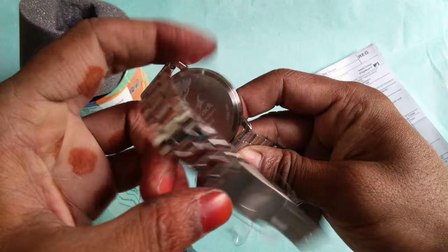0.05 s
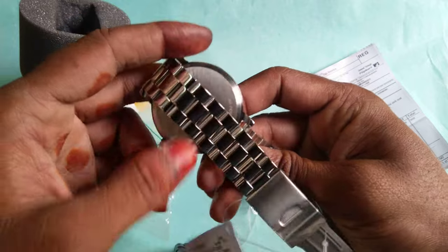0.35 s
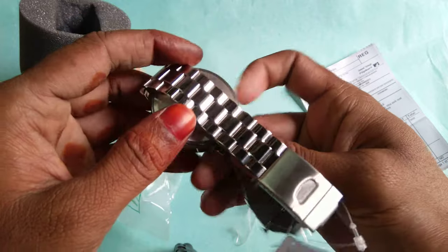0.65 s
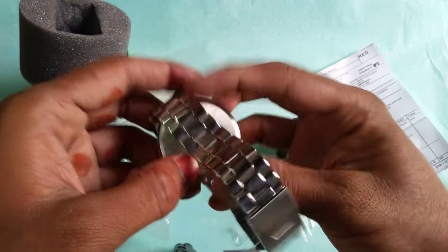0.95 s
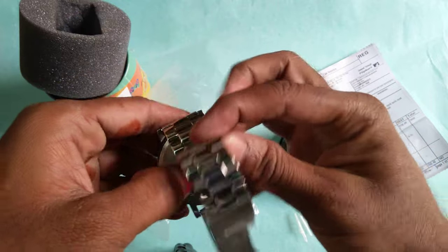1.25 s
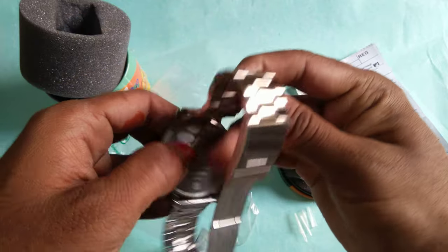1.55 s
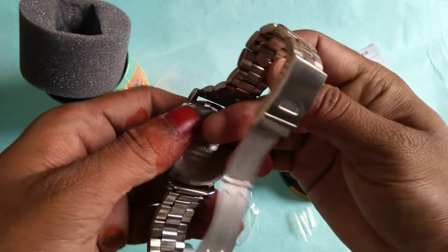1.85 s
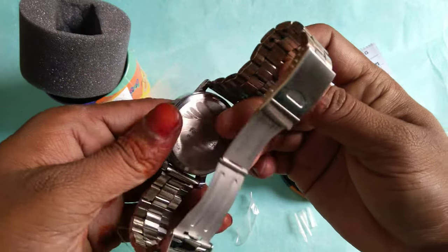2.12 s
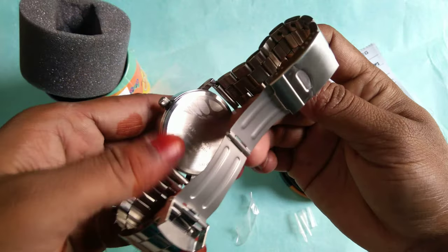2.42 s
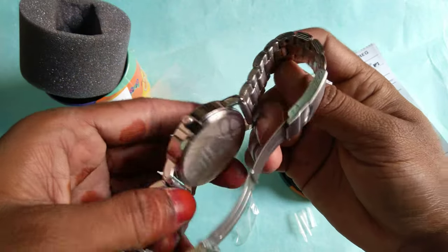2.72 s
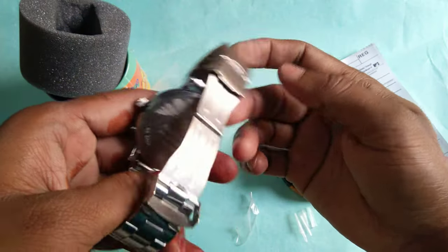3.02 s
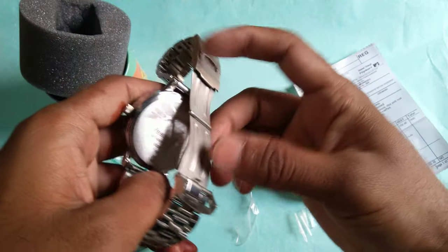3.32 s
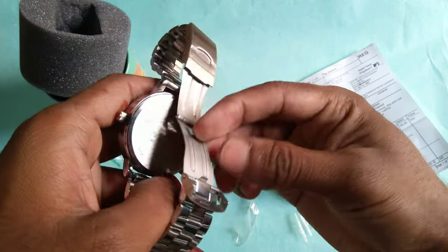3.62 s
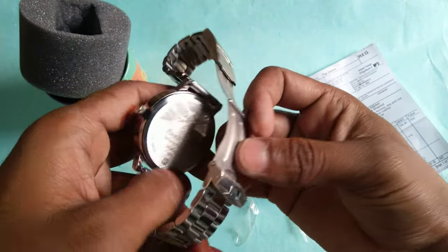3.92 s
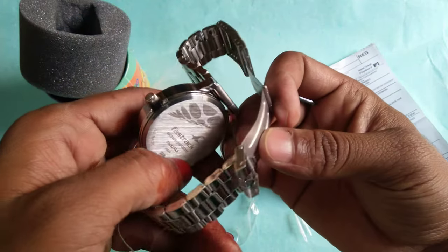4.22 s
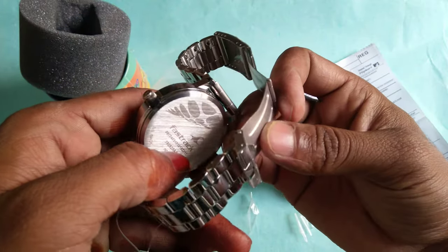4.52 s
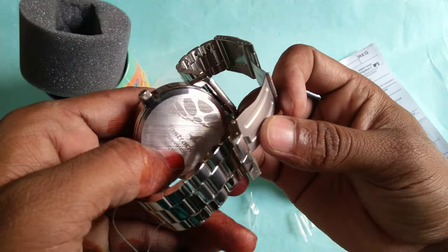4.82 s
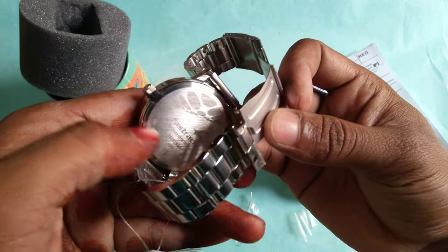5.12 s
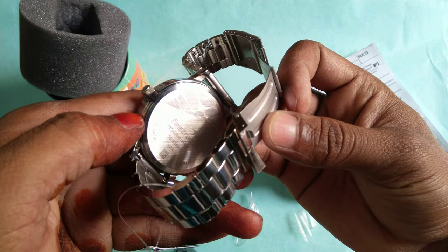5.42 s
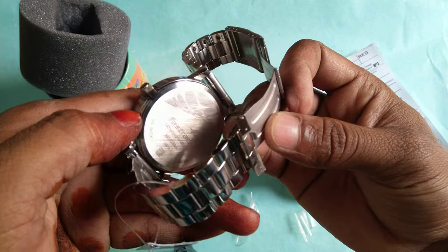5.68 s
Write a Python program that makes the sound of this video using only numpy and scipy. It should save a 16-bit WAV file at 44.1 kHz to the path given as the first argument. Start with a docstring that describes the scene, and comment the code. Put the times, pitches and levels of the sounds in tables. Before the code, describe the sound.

Close up in a quiet small room, a metal watch bracelet rattles with short, bright clicks and a light scraping of links as fingers shift it. The clinking thins out, returns briefly around the middle, and gives way to a thin, stuttering squeak from the clasp. Then skin hisses softly across steel over a few low handling thumps. A very faint motor whine and distant bird chirps lie underneath.

```python
"""A steel watch turns in two hands, close to a phone in a small room: links and folding clasp strike
each other with a crack and a short ring, among a few dull knocks. The bracelet rasps,
the clasp hinge sticks and slips into a squeak, and a thumb slides off the case back.
Soft handling bumps rumble underneath; a faint motor whines and a small bird chirps far away."""
import sys
import numpy as np
from scipy import signal
from scipy.fft import rfft, irfft, next_fast_len
from scipy.io import wavfile
from scipy.ndimage import uniform_filter1d, minimum_filter1d

SR = 44100
rng = np.random.default_rng(int(sys.argv[2]) if len(sys.argv) > 2 else 0)


def dump(signal):
    """Clip the signal to [-1, 1] and save it as 16-bit WAV at the path in sys.argv[1]."""
    limited = np.clip(np.atleast_2d(signal).T, -1, 1)
    pcm = np.round(limited * 32767).astype(np.int16)
    wavfile.write(sys.argv[1], SR, pcm)


N = 253575
TIME = np.arange(N) / SR


def undb(db):
    """Decibels to gain."""
    return 10 ** (np.asarray(db) / 20)


def unit(x):
    """Scale to rms 1."""
    return x / np.sqrt(np.mean(x ** 2) + 1e-20)


def unit_attack(x):
    """Scale each channel so that its first 5 ms have a spread of 1."""
    return x / np.std(x[:, :220], axis=1, keepdims=True)


def colour(x, points):
    """Minimum-phase EQ through (frequency [Hz], gain [dB]) points, scaled to rms 1."""
    n = x.shape[-1]
    size = 2 * next_fast_len(n)
    hz, db = np.transpose(sorted(points))
    log_gain = np.interp(np.log(np.fft.rfftfreq(size, 1 / SR) + 1), np.log(hz), np.log(undb(db)))
    cepstrum = irfft(log_gain)
    cepstrum[1:size // 2] *= 2
    cepstrum[size // 2 + 1:] = 0
    return unit(irfft(rfft(x, size) * np.exp(rfft(cepstrum)))[..., :n])


def pan(db):
    """Constant-power stereo gains; a pan is left minus right in dB."""
    gains = undb(np.array([db, -db]).reshape(2, -1) / 2)
    return gains / np.sqrt(np.mean(gains ** 2, axis=0))


def stereo_noise(n, shared, lag_samples=6):
    """Noise at two microphones; the shared part reaches the right one slightly later."""
    common = rng.standard_normal(n)
    centre = np.array([common, np.roll(common, lag_samples)])
    return np.sqrt(shared) * centre + np.sqrt(1 - shared) * rng.standard_normal((2, n))


def add(out, s, sound):
    """Mix a short sound in at s seconds."""
    start = max(int(s * SR), 0)
    part = sound[:, :max(N - start, 0)]
    out[:, start:start + part.shape[1]] += part


def wander(n, rate):
    """Random drift with a spread near 1 and `rate` new values a second."""
    return np.interp(np.arange(n) * rate / SR, np.arange(n), rng.standard_normal(n))


def ring(t, hz, t60, lag_s=.00009):
    """A struck mode; its phase at the right microphone depends on how the part happens to lie."""
    phase_gap = 2 * np.pi * hz * lag_s + 0.89 * rng.standard_normal()
    attack = 1 - np.exp(-t * hz)  # builds within a cycle or two
    decay = np.exp(-np.log(1000) * t / t60)
    return np.sin(2 * np.pi * hz * t - np.array([[0], [phase_gap]])) * decay * attack


def gestures(table, attack_s, release_s):
    """Stereo envelope of hand movements: each builds, holds and dies away."""
    out = np.zeros((2, N))
    for s, length, db, pan_db in table:
        t = np.arange(int((length + 8 * release_s) * SR)) / SR
        envelope = np.minimum(t / attack_s, 1) * np.exp(-np.maximum(t - length, 0) / release_s)
        add(out, s, undb(db) * pan(pan_db) * envelope)
    return out


def friction(eq, rate, spread_db, grain_s, hiss):
    """Rubbing: about `rate` tiny catches a second, uneven in size, over a smooth hiss."""
    catches = (rng.random(N) < rate / SR) * undb(spread_db * np.minimum(rng.exponential(size=N), 3))
    grains = unit(signal.lfilter([1], [1, -np.exp(-1 / (grain_s * SR))], catches))
    return colour(stereo_noise(N, 0.18) * (grains + hiss), eq)


def room(x, wet_db, early_db, t60=0.34, early_s=.008):
    """Table and hands reflect at once; the walls answer with a short diffuse tail."""
    eq = [(500, 12.5), (2200, 6.5), (3600, 0), (5500, -1.5), (10000, -3.5), (16000, -7.5), (20000, -12)]
    t = np.arange(SR // 2) / SR
    decay = np.exp(-np.log(1000) * t / t60) + undb(early_db) * np.exp(-t / early_s)
    attack = np.clip(t / 0.002 - .5, 0, 1)
    tail = colour(rng.standard_normal((2, len(t))) * decay * attack, eq) / np.sqrt(len(t))
    return x + undb(wet_db) * signal.fftconvolve(x, tail, axes=1)[:, :N]


def room_tone(level_db=-77):
    """A steady bed of soft air noise."""
    # spectrum of the air: (frequency [Hz], gain [dB])
    air_eq = [(88, -32), (150, -0.5), (566, -8.5), (745, -10.5), (1120, -10), (1390, -13), (1720, -17),
              (2310, -18), (3040, -29), (4240, -26.5), (4950, -15.5), (5460, -23), (10600, -17.5),
              (16000, -46)]
    return undb(level_db) * colour(stereo_noise(N, 0.41), air_eq)


def motor(whirr_db=-76, pan_db=-6.5):
    """A faint motor: a narrow whirr and fixed pitches that waver in level."""
    # tones of the motor: (frequency [Hz], level [dB])
    tones = [(300, -86), (1200, -93.5), (1303, -88), (1401, -83.5), (1502, -90), (2304, -81.5), (2353, -94)]
    whirr_eq = [(1000, -49), (1800, -16.5), (2150, 1.5), (2320, -2), (2480, -9), (3800, -4), (6000, -37)]
    whirr = undb(whirr_db) * colour(stereo_noise(N, 1.0), whirr_eq)
    whine = np.zeros((2, N))
    for hz, db in tones:
        tone = np.sqrt(2) * np.sin(2 * np.pi * hz * TIME - np.array([[0], [1.5]]))
        whine += undb(db + 2 * wander(N, 18)) * tone
    return (whirr + whine) * pan(pan_db)


def bird(waver_hz=165, pan_db=-5, trim_db=-5):
    """Thin gliding whistles, made raspy by fast flutter in pitch and level."""
    # distant chirps: (start [s], length [s], start pitch [Hz], end pitch [Hz], level before trim [dB])
    chirps = [(0.651, 0.2, 4800, 5050, -57.5), (1.678, 0.25, 5040, 4750, -65.5),
              (2.107, .19, 4280, 5050, -59.5), (2.332, .13, 5040, 4610, -65.5),
              (2.486, 0.32, 3350, 3346, -74), (2.66, .17, 5030, 4450, -73), (3.298, 0.15, 4810, 4970, -74),
              (3.633, 0.19, 4840, 4490, -57), (3.919, .15, 4890, 4820, -63), (4.236, 0.15, 4780, 4880, -61),
              (4.532, 0.19, 4930, 4620, -64.5), (4.539, 0.59, 1805, 2140, -68),
              (4.852, 0.27, 4740, 4930, -61), (5.542, 0.17, 4750, 4680, -69)]
    out, t = np.zeros((2, N)), np.arange(SR // 2) / SR
    for s, length, start_hz, end_hz, db in chirps:
        progress = np.minimum(t / length, 1)
        hz = start_hz + (end_hz - start_hz) * progress + waver_hz * wander(len(t), 1200)
        tone = np.sin(2 * np.pi * np.cumsum(hz) / SR - np.array([[0], [2.]]))
        envelope = np.sin(np.pi * progress) * undb(6.2 * wander(len(t), 196.4))
        add(out, s, undb(db + trim_db) * pan(pan_db) * tone * envelope)
    return out


def handling(rest_db=-73, rest_pan_db=-5, bump_s=0.0063, bump_pan_db=18):
    """Low rumble travels through the phone's support, with a few dull bumps."""
    # spectrum of the rumble: (frequency [Hz], gain [dB])
    rumble_eq = [(15, -46.5), (25, -30), (54, 4.5), (70, 8), (104, 1), (165, -6.5), (270, -37),
                 (325, -30.5), (357, -33), (425, -46), (600, -38), (780, -76), (1320, -120)]
    # the hands press on the support: (start [s], length [s], level [dB], pan [dB])
    leans = [(.22, 0.49, -52, -4), (.75, 0.5, -54.5, -3.5), (1.38, 0.29, -58.5, -5),
             (2.58, 0.51, -67.5, -6), (4.7, 0.52, -45, 5), (5.27, 0.27, -52.5, 0), (5.6, 0.28, -34.5, 23.5)]
    # soft bumps that reach the phone: (time [s], level [dB], pitch [Hz])
    bumps = [(4.991, -30, 72), (5.178, -34, 88), (5.623, -24.5, 102.6), (5.678, -24, 97)]
    rumble = colour(stereo_noise(N, 0.66), [(10, -44.5), *rumble_eq, (2000, -75)])
    pressure = gestures(leans, attack_s=0.083, release_s=0.052)
    out = rumble * np.hypot(pressure, undb(rest_db) * pan(rest_pan_db))
    t = np.arange(SR // 10) / SR
    for s, db, hz in bumps:
        swell = (t / bump_s * np.exp(1 - t / bump_s)) ** 2
        add(out, s, -undb(db) * pan(bump_pan_db) * np.sin(2 * np.pi * hz * t) * swell)
    return out


def fingertip_brush():
    """Skin catches on the clasp in one brief, grainy stroke."""
    # the stroke: (start [s], length [s], level [dB], pan [dB])
    stroke = [(1.805, 0.07, -58, -10.5)]
    # spectrum of skin on the clasp: (frequency [Hz], gain [dB])
    brush_eq = [(2500, -24), (3700, 7), (4700, 8.5), (6000, 7), (7500, -18.5), (15000, -27.5)]
    rub = friction(brush_eq, rate=2500, spread_db=9.5, grain_s=0.0011, hiss=0.59)
    return rub * gestures(stroke, attack_s=0.0058, release_s=0.032)


def thumb_slide(trim_db=2, pan_db=-9):
    """The thumb rubs over the case back with a smooth, bright hiss."""
    # envelope of the slide: (time [s], level before trim [dB])
    slide = [(4.9, -72.5), (4.934, -76), (4.946, -60), (5.272, -54), (5.39, -55.5), (5.592, -70),
             (5.72, -68)]
    # spectrum of skin on the case: (frequency [Hz], gain [dB])
    thumb_eq = [(1500, -34), (2100, -6.5), (2700, -22.5), (3300, -4.5), (4200, -1), (8000, 2), (10800, 0.5),
                (13000, -10.5), (16000, -16.5)]
    rub = friction(thumb_eq, rate=1100, spread_db=3, grain_s=0.0022, hiss=2.9)
    level_db = np.interp(TIME, *np.transpose(slide)) + trim_db
    fade_in = np.interp(TIME, [4.86, 4.93], [0, 1])
    return rub * undb(level_db) * pan(pan_db) * fade_in


def hinge_squeak(pan_db=-7, creep_s=0.031, creep_db=-9, ease_db=-5, rise_share=0.31, jitter=0.21):
    """Under each push the dry pin sticks and slips in spurts that ring the clasp, creeping in between."""
    # pushes on the hinge: (start [s], length [s], slip rate [1/s], level [dB])
    pushes = [(4.076, 0.034, 43, -62), (4.119, 0.039, 50, -51), (4.163, 0.033, 39.6, -48),
              (4.243, 0.065, 48.6, -44.5), (4.356, 0.037, 68, -44.5), (4.455, .066, 37.5, -55.5),
              (4.568, 0.066, 39, -62.5)]
    # resonances of the clasp: (frequency [Hz], gain [dB])
    clasp_eq = [(2800, -42), (3550, -8), (3900, 13.5), (4300, -14), (5200, -38), (7400, -39), (8200, 6),
                (8900, -23), (10000, -20.5), (11900, -6.5), (13500, -29.5), (15300, -18.5), (16500, -17)]
    spurts, t = np.zeros((1, N)), np.arange(SR // 5) / SR
    for s, length, rate, db in pushes:
        phase = np.cumsum(rate * (1 + jitter * wander(len(t), 53))) / SR % 1
        slip = np.interp(phase, [0, rise_share, 1], [0, 1, 0]) ** 2
        envelope = undb(db + ease_db * t / length) * np.clip((length - t) / 0.0031, 0, 1)
        add(spurts, s, (slip * envelope)[None])
    pole = np.exp(-1 / (creep_s * SR))
    creep = undb(creep_db) * signal.lfilter([4 * (1 - pole)], [1, -pole], spurts)
    rub = friction(clasp_eq, rate=1400, spread_db=2.5, grain_s=0.00019, hiss=0.16)
    return rub * (spurts + creep) * pan(pan_db)


def dull_knocks(attack_s=.002, thud_db=-13, thud_s=0.0073, ring_cycles=34):
    """Dull knocks, each a low note with a rough thud; two faint ones sit much lower in pitch."""
    # dull knocks, two of them faint and low: (time [s], level [dB], pitch [Hz], thud offset [dB])
    knocks = [(.135, -41.5, 2025, 0), (.145, -42, 1402, -6), (.486, -37.5, 2065, -14),
              (.563, -36.5, 2040, -14), (.752, -40, 2360, -11), (1.389, -48, 1147, 2.5),
              (1.409, -40.5, 2050, -8.5), (1.466, -43.5, 2040, -13), (1.503, -49, 2070, -15),
              (2.16, -62.5, 298, -13), (4.605, -57.5, 640, -8.5)]
    # spectrum of the thud: (frequency [Hz], gain [dB])
    thud_eq = [(120, -19.5), (300, -5), (600, 1), (850, -8), (1150, -5), (1600, -3.5), (2500, -6),
               (4000, -25.5)]
    out, t = np.zeros((2, N)), np.arange(SR // 8) / SR
    attack = 1 - np.exp(-t / attack_s)
    for s, db, hz, offset_db in knocks:
        thud = colour(stereo_noise(len(t), 0.53), thud_eq) * np.exp(-t / thud_s)
        note = ring(t, hz, ring_cycles / hz)
        add(out, s, undb(db) * (note + undb(thud_db + offset_db) * thud) * attack)
    return out


def bracelet_motion():
    """How hard the fingers shift the bracelet: the envelope that drives its rasp and jostle."""
    # shifts of the bracelet: (start [s], length [s], level [dB], pan [dB])
    shifts = [(0, 1.8, -71, 1), (.025, .04, -60, 5), (.062, .07, -45.5, 0.5), (.397, .11, -58, 2.5),
              (.55, .07, -65, -3), (.622, .11, -61.5, -2), (.75, 0.073, -55, -5), (.85, 0.1, -64, -3),
              (.96, .18, -52, -4.5), (1.14, .06, -60, 0), (1.315, .21, -62.5, -1.5), (1.59, 0.14, -66, -5),
              (1.89, .12, -71.5, 2), (2.78, .08, -73, -5), (2.862, .035, -47, 3.5), (2.95, .055, -46, -3),
              (3.09, .05, -64.5, -5), (3.44, .14, -65.5, 2), (3.715, .14, -65, -1.5),
              (3.97, .09, -73, -3.5)]
    return gestures(shifts, attack_s=0.016, release_s=0.035)


def bracelet_rasp(motion, trim_db=-1, shimmer_db=6, shimmer_rate=22, bands=16):
    """Links rub on links; the touching pairs keep changing, so each band swells and fades on its own."""
    # spectrum of sliding steel: (frequency [Hz], gain [dB])
    rasp_eq = [(1000, -38.5), (2000, -7.5), (2900, -11.5), (3550, 0.5), (4000, 1.5), (4500, -3),
               (5400, -3.5), (6800, -5.5), (8200, 3.5), (9200, -2), (10300, 5.5), (12500, -5.5),
               (14200, -6.5), (16000, -14)]
    rub = friction(rasp_eq, rate=620, spread_db=1.5, grain_s=0.003, hiss=0.3)
    edges_hz = np.linspace(1500, 16500, bands + 1)
    rasp = np.zeros((2, N))
    for k in range(bands):
        band = signal.sosfilt(signal.butter(2, edges_hz[k:k + 2], "band", fs=SR, output="sos"), rub)
        swell = undb(shimmer_db * np.clip(wander(N, shimmer_rate), -2, 2))
        rasp += (-1) ** k * band * swell
    return unit(rasp) * motion * undb(trim_db)


def jostle(motion, tick_db=4, scatter_db=2, low_db=-10, top_db=-2, ring_db=-2, low_share=0.21, count=84):
    """List small chance contacts between links, denser and louder the more the bracelet moves."""
    # note ranges of the low and high links; notes past SR / 2 fold down: (lowest [Hz], highest [Hz])
    note_ranges = [(3200, 4200), (7500, 34000)]
    strength = np.sqrt(np.mean(motion ** 2, axis=0)) + 1e-12
    activity = np.cumsum(np.sqrt(strength))
    when, group, note = rng.random((count, 3)).T
    size, side = rng.standard_normal((count, 2)).T
    onsets = np.searchsorted(activity, activity[-1] * (np.arange(count) + when) / count)
    lowest, highest = np.array(note_ranges)[(group > low_share).astype(int)].T
    notes_hz = lowest + note * (highest - lowest)
    levels_db = 20 * np.log10(strength[onsets]) + tick_db + scatter_db * np.clip(size, -2, 2)
    return [(s, db, pan_db, low_db, top_db, hz, ring_db)
            for s, db, pan_db, hz in zip(onsets / SR, levels_db, 3 * side - 2.5, notes_hz)]


def link_strike(low_db, top_db, crack_s=0.00052, crack_db=-2, chatter_s=.004, chatter_db=-15,
                mode_t60=.014, scatter_db=3, modes=18):
    """Steel hits steel: a crack of noise and a scatter of short modes, new for each pair of links."""
    eq = [(200, low_db - 28), (900, low_db - 22), (1500, low_db - 17), (2400, low_db),
          (3100, low_db / 2 - 5.5), (3800, 0), (4700, -2), (6200, 1.5), (9500, 1.66),
          (12500, top_db), (16000, top_db + 0.5)]
    t = np.arange(SR // 25) / SR
    attack = 1 - np.exp(-t / 0.0001)
    decay = np.exp(-t / crack_s) + undb(chatter_db) * np.exp(-t / chatter_s)
    crack = colour(stereo_noise(len(t), 0.79) * attack * decay, eq)
    links = np.zeros((2, len(t)))
    for hz in 1700 + 14000 * (np.arange(modes) + rng.random(modes)) / modes:
        db = np.interp(hz, *np.transpose(eq)) + scatter_db * rng.standard_normal()
        links += undb(db) * rng.choice([-1, 1]) * ring(t, hz, mode_t60)
    return unit_attack(unit_attack(links) + undb(crack_db) * unit_attack(crack))


def watch_clinks(motion, trim_db=1, note_trim_db=-1, note_t60=.017, bracelet_db=-8):
    """Each contact rings the struck part and the whole bracelet, briefly: the fingers damp the steel."""
    # clear metal contacts: (time [s], level before trim [dB], pan [dB], low-mid EQ [dB], top EQ [dB],
    # note [Hz], note over strike before trim [dB])
    contacts = [(.0301, -50.5, 0, 3.5, -0.5, 10120, -4), (.0451, -48, 3, -8, -0.5, 10600, 0.5),
                (.0612, -38.5, 1, -7, -1, 14860, -2), (.1346, -14, -5, -9, -4, 3910, 0),
                (.142, -22.5, 9, -6.5, 1, 3780, 0), (.1448, -27, -2, 1, -16, 4170, -15),
                (.1547, -22, -2, 4, -2, 8650, -0.5), (.2699, -42, -2, -6, 1, 8740, -17),
                (.4304, -48.5, -0.5, -6, 7, 8300, 8), (.4427, -42.5, -2.5, 9, -9.5, 3900, 11),
                (.4678, -45.5, -6, -2, -12, 3850, 2.5), (.5597, -49.5, -2.5, 4, -12, 3660, -3),
                (.6322, -52.5, -4, 7, -6, 4430, 1), (.6496, -49.5, -2, -12, -4, 3950, -4),
                (.7122, -44.5, -1, -24, 10, 7800, -4), (.7518, -31, -5.5, 4.5, -10, 7900, -12),
                (.9144, -47, -2, -8, 8, 3770, -1.5), (.969, -37.5, 0, -32, 2, 13200, -9),
                (1.0137, -41, -2, -21, -1, 3540, 3.5), (1.0341, -43.5, -2.5, -9.5, 3, 3660, 1),
                (1.0443, -41.5, 5, -26, 4, 9820, 0), (1.0601, -29.5, -11.5, -16, -1, 9650, -1.5),
                (1.0701, -38, -4, -27, -11, 10700, 4), (1.0904, -38.5, -9, -9, -7, 8300, -2),
                (1.1376, -46.5, -3, -7, 5, 3550, 1), (1.2153, -58, 7, -14, 15, 9000, -4),
                (1.3501, -54.5, 1, -10, 14, 12700, 1), (1.3892, -27, -4.5, -21, 1, 13700, -6),
                (1.4671, -49, -7, -4, -13, 3350, 5), (1.5893, -43.5, -1, -18, 0, 14140, 2),
                (1.6614, -41, -3, -41, 0.5, 8100, -10), (1.8863, -50.5, -7, 10, -6, 3840, 14.5),
                (2.881, -41.5, 14, -15, 0, 7800, -10), (2.8878, -39, -1, -11, -3.5, 13500, -9),
                (2.9504, -24, -5.5, -13, -4.5, 3810, -5), (2.9654, -38, 5, -13, -6, 11800, 2),
                (2.9775, -42, -9, -7, -4, 10000, -8), (3.0132, -29.5, 1, -3, -3, 11300, -8),
                (3.0248, -25, -4, -12.5, -13, 10880, 6.5), (3.1069, -50.5, -5, -11, -8.5, 3810, 13),
                (3.4224, -51, -3, -18, -6, 5680, 5), (3.4411, -40, -3, -35, -4, 7640, -6.5),
                (3.5217, -50, 5, -29.5, -10, 9400, -10), (3.5355, -40, -8, -8.5, -5, 7020, 3),
                (3.7125, -41, -1, -32, -8, 7800, -13)]
    # modes of the bracelet: (frequency [Hz], relative level [dB], t60 [s])
    bracelet_modes = [(3600, -36.5, .08), (4139, -22.5, 0.15), (3950, -28, .06), (5420, -26, 0.052),
                      (6500, -28.5, 0.087), (7540, -22.5, 0.16), (8350, -25.5, .07), (8300, -31, 0.046),
                      (10000, -27, .05), (15000, -27.5, .05)]
    out, t = np.zeros((2, N)), np.arange(SR // 10) / SR
    for s, db, pan_db, low_db, top_db, hz, note_db in list(contacts) + jostle(motion):
        strike = link_strike(low_db, top_db)
        note = ring(t[:strike.shape[1]], hz, note_t60 * min(3800 / hz, 1))  # high notes die sooner
        hit = unit_attack(strike + undb(note_db + note_trim_db) * unit_attack(note))
        bracelet = sum(undb(bracelet_db + mode_db + 5 * rng.standard_normal()) * ring(t, mode_hz, t60)
                       for mode_hz, mode_db, t60 in bracelet_modes)
        gain = undb(db + trim_db) * pan(pan_db)
        add(out, s, gain * hit)
        add(out, s, gain * bracelet)
    # parts this small radiate almost no bass
    return signal.sosfilt(signal.butter(2, 1300, "high", fs=SR, output="sos"), out)


def facing(x, treble_pan_db=2, treble_hz=6000):
    """The left microphone faces the watch and hears a little more of its treble."""
    treble = signal.sosfilt(signal.butter(1, treble_hz, "high", fs=SR, output="sos"), x)
    return x + treble * (pan(treble_pan_db) - 1)


def scene():
    """The watch up close in the room, over rumble and far sounds."""
    bed = room_tone() + motor() + handling() + room(bird(), wet_db=3.5, early_db=7)
    motion = bracelet_motion()
    impacts = facing(watch_clinks(motion)) + dull_knocks()
    rubs = hinge_squeak() + bracelet_rasp(motion) + fingertip_brush() + thumb_slide()
    return bed + room(impacts + rubs, wet_db=-7.5, early_db=15.5)


def record(dry, ceiling=0.62, window_samples=90, top_hz=15800):
    """The phone limits any peak over the ceiling, fades out as it stops and cuts the top."""
    needed = np.minimum(1, ceiling / (np.abs(dry).max(axis=0) + 1e-9))
    gain = uniform_filter1d(minimum_filter1d(needed, window_samples), window_samples)
    fade_out = np.clip((N - np.arange(N)) / 300, 0, 1)
    return signal.sosfilt(signal.ellip(8, .2, 70, top_hz, fs=SR, output="sos"), dry * gain * fade_out)


dry = scene()
out = record(dry)
dump(out)
```